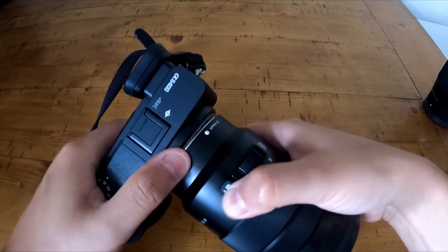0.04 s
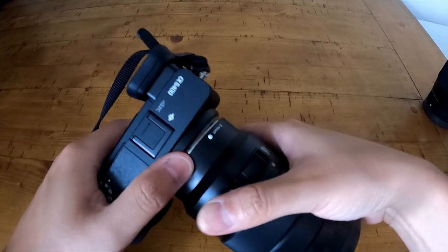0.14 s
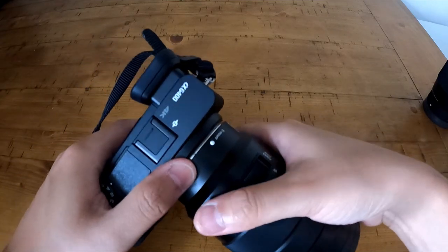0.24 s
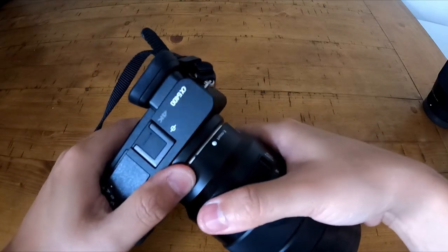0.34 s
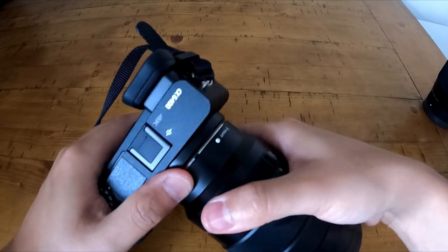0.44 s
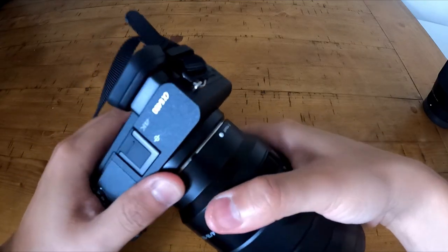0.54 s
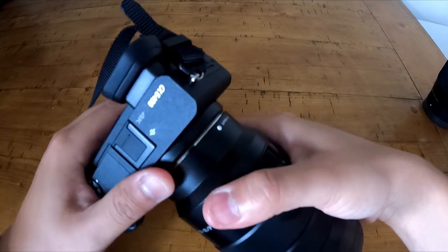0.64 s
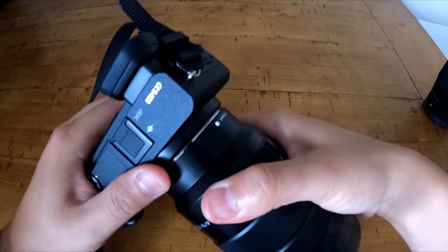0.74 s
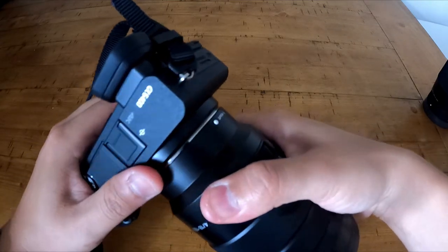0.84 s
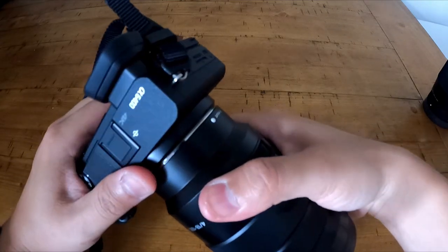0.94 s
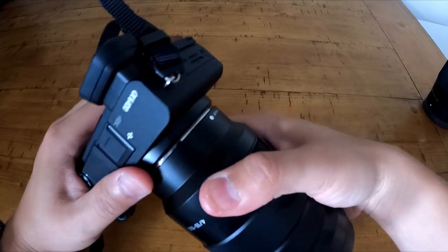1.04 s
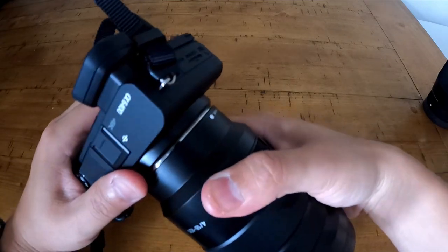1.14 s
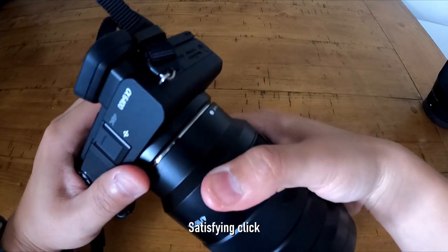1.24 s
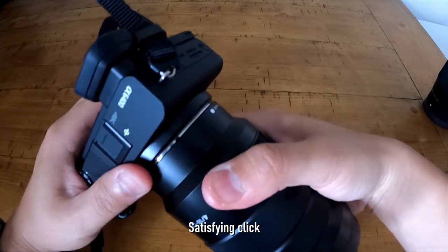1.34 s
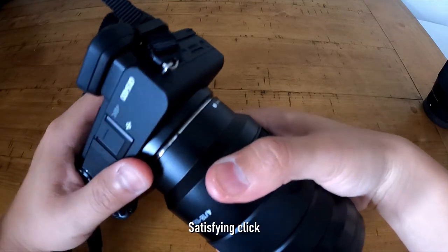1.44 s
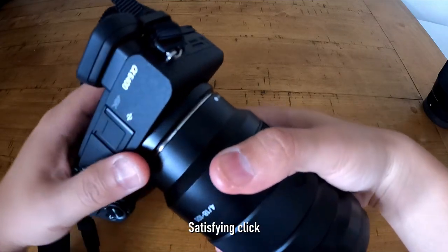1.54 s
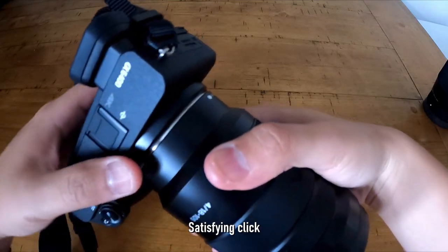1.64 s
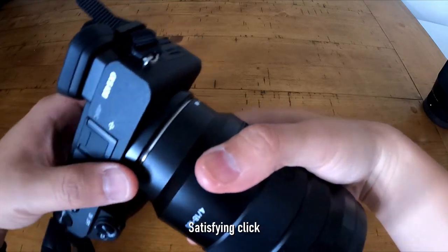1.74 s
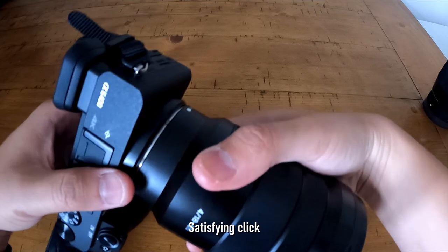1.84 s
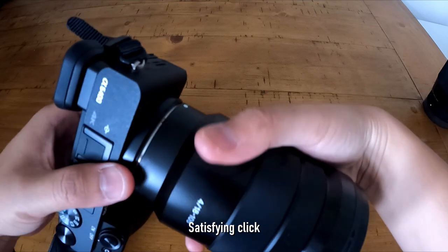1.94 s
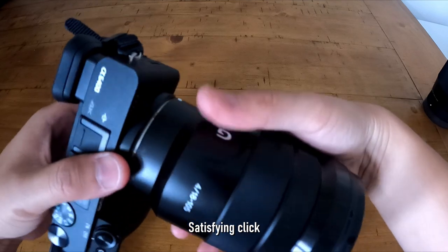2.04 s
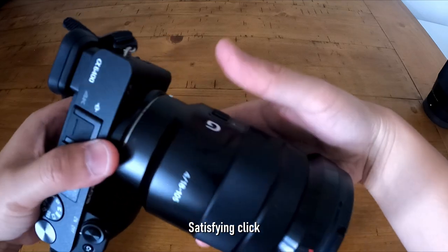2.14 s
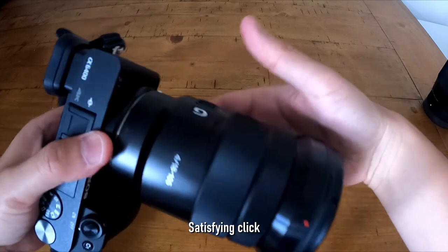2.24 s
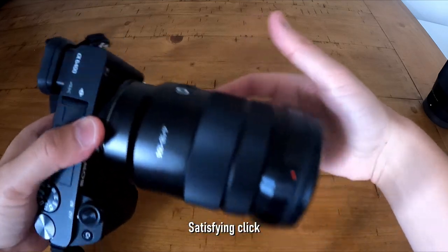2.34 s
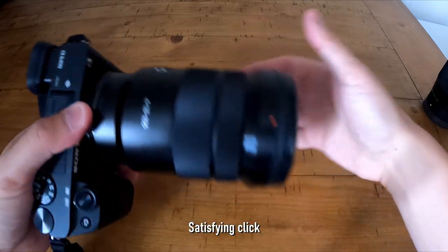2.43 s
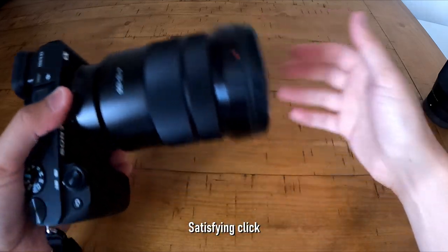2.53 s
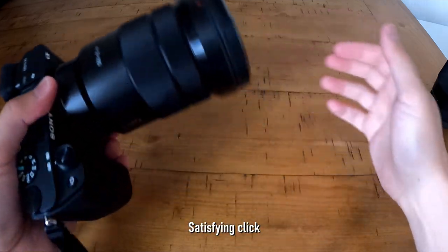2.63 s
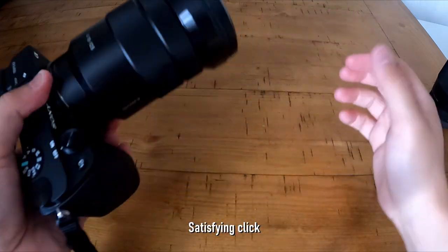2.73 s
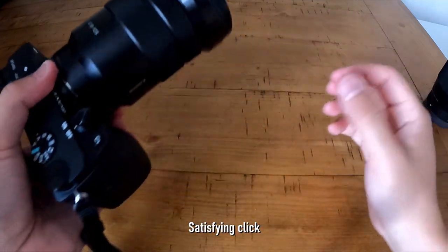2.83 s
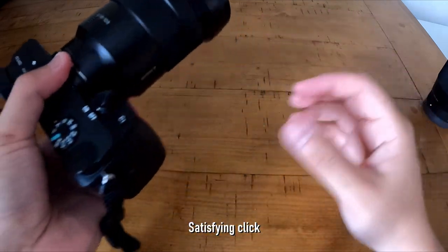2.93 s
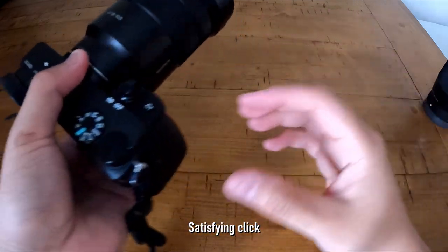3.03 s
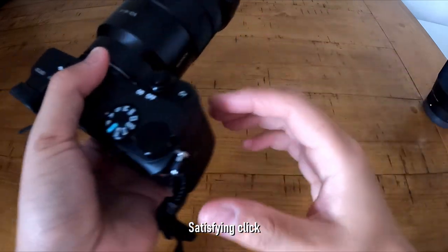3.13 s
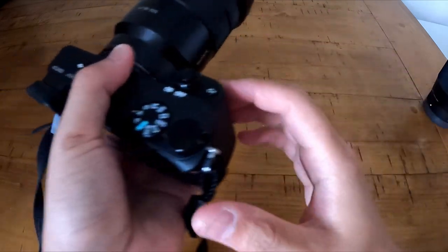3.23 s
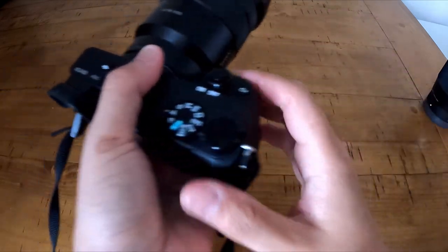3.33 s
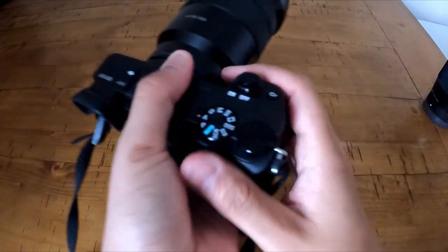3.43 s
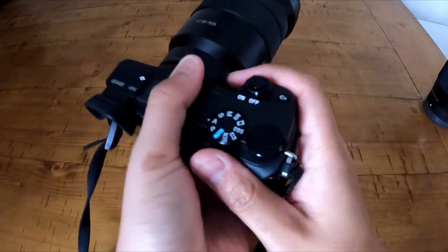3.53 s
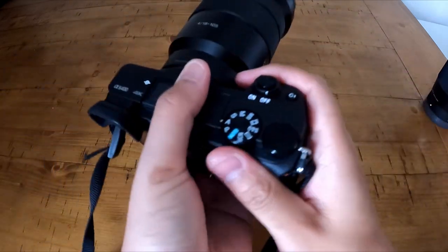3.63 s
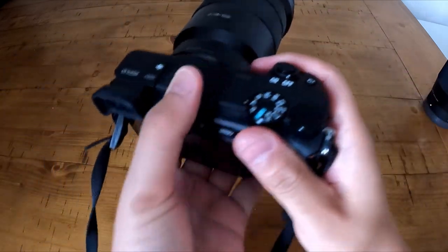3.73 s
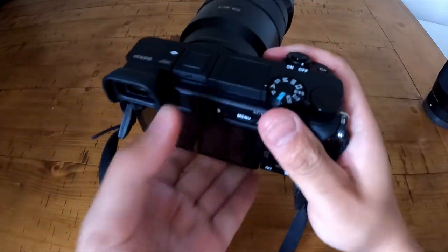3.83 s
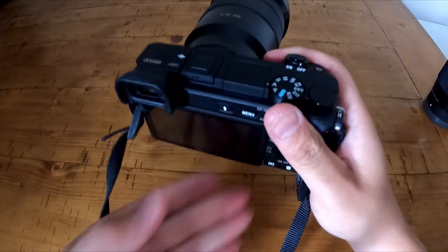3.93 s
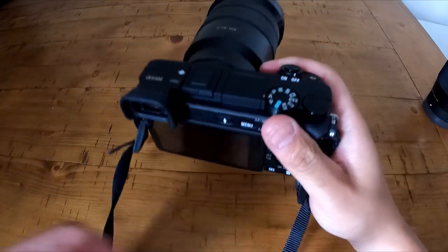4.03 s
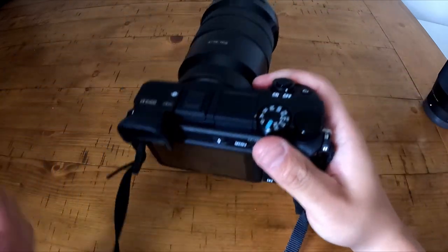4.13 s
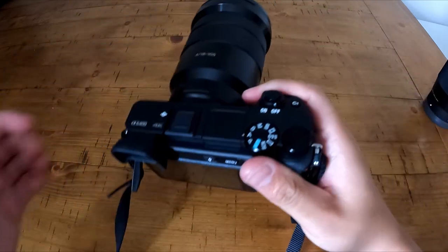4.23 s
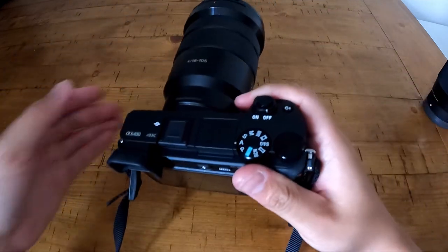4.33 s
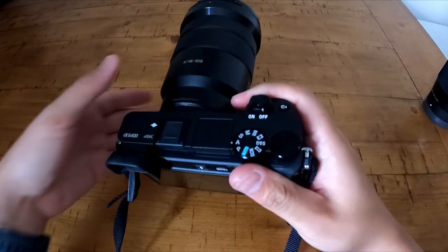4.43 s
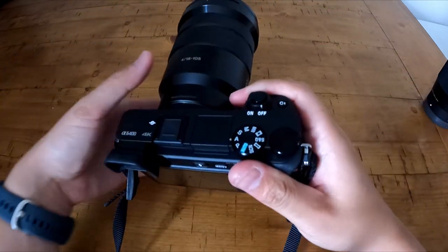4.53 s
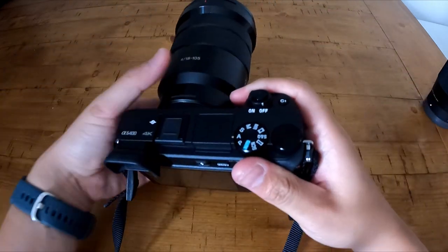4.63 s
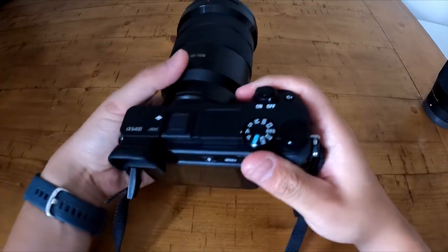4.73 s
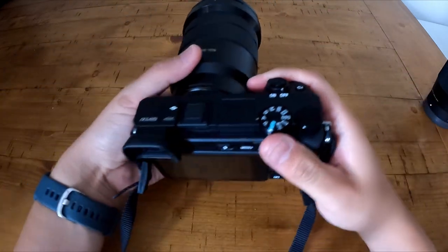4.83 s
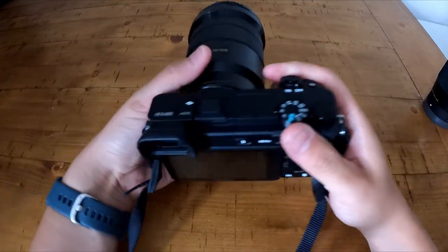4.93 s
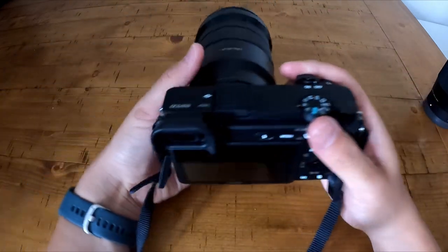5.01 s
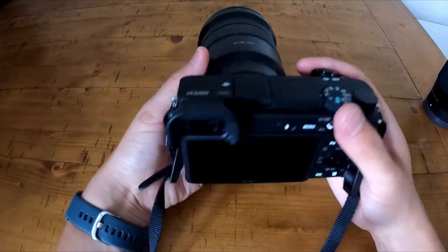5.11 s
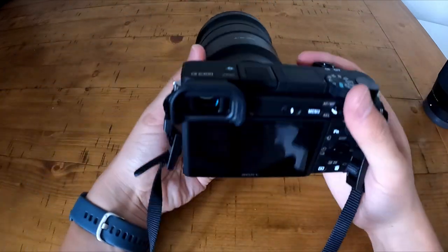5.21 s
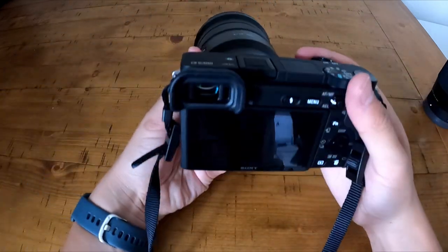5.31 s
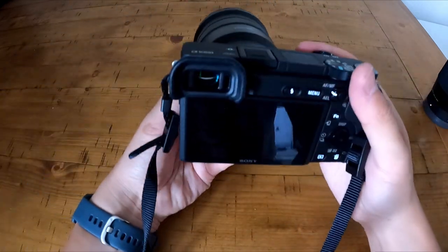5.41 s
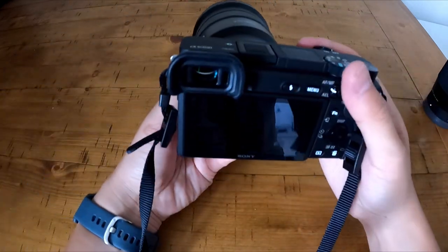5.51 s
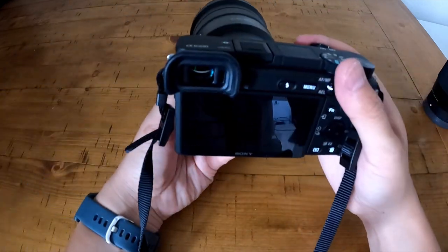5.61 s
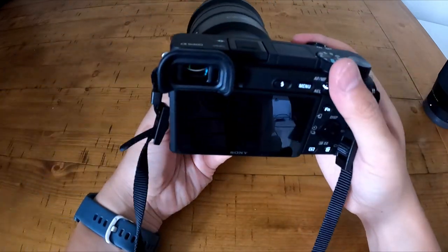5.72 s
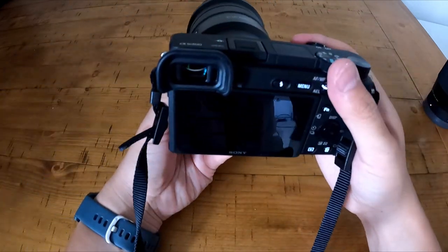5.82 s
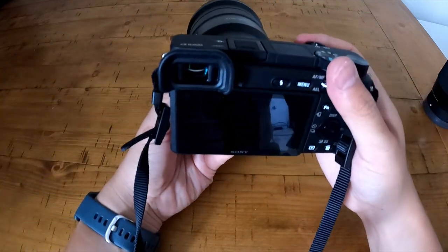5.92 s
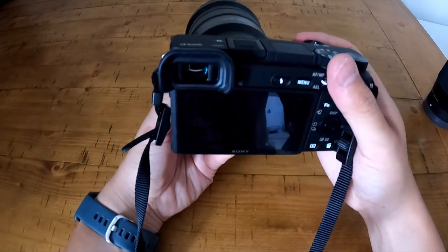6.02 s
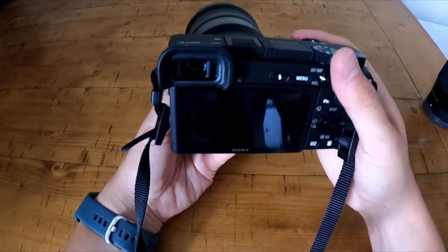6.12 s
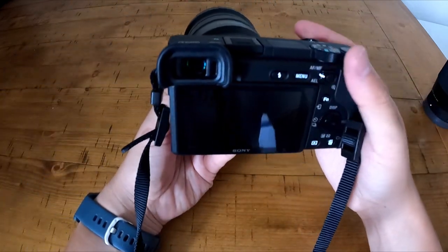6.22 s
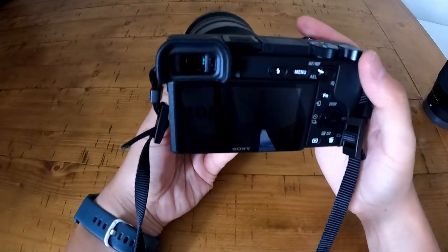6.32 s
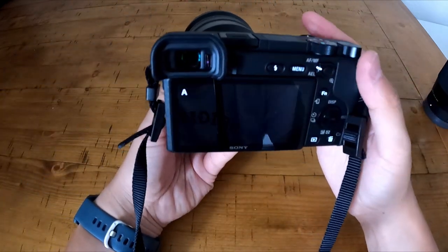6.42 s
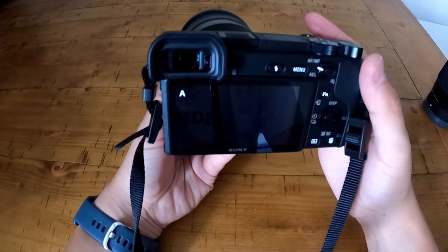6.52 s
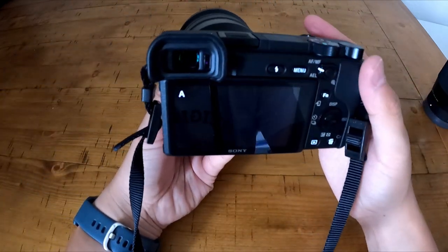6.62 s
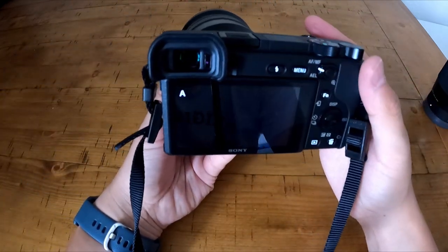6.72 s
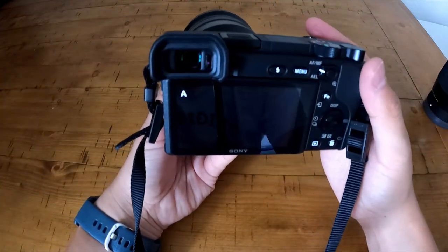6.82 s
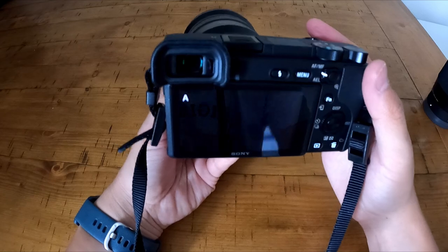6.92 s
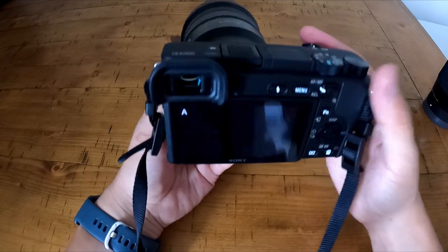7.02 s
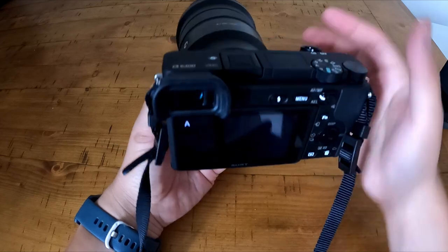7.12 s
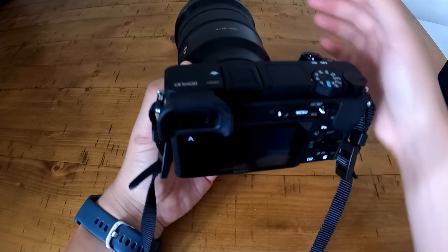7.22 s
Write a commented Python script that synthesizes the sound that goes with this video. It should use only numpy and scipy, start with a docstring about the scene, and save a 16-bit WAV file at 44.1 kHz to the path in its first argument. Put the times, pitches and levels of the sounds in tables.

```python
"""A small quiet room, at a wooden table: a lens is twisted onto a camera. The bayonet grates as noise grains,
the flange slides as filtered noise, and the locking pin snaps home as impulses into resonances.
Fingers hiss and rasp over the finish by friction; the shell creaks and ticks, a loose part clatters,
the grip knocks, a button clicks and the power switch is flicked: brief forces ring resonant bodies.
Dull thumps ring the table's decaying modes over faint room hiss and a low steady drone of shaped noise."""
import sys
import numpy as np
from scipy import signal
from scipy.fft import rfft, irfft, next_fast_len
from scipy.io import wavfile
from scipy.ndimage import uniform_filter1d, map_coordinates

SR = 44100
rng = np.random.default_rng(int(sys.argv[2]) if len(sys.argv) > 2 else 0)


def unload_wav(signal):
    """Save mono or channel-first audio to the path in sys.argv[1] as 16-bit WAV at rate SR, clipped to [-1, 1]."""
    wavfile.write(
        sys.argv[1],
        SR,
        np.round(np.clip(np.atleast_2d(signal).T, -1, 1) * 32767).astype(np.int16),
    )


N = 320166

# blows of the locking pin, which skips twice, drops in and chatters: t/s, peak level/dB
PIN_BLOWS = [(1.2374, -20.5), (1.2396, -18.5), (1.2427, -8.5), (1.2441, -14.5), (1.2452, -24)]
# blows of the power switch riding over its detent: t/s, peak level/dB before panning
SWITCH_BLOWS = [(6.0357, -45), (6.0464, -36), (6.0499, -37.5), (6.0535, -29.5), (6.0556, -28.5),
                (6.0569, -9), (6.0575, -11), (6.0589, -15.5)]
# resonances of the camera shell: f/Hz, width/Hz, relative level/dB
SHELL_MODES = [(633, 84, 7), (1077, 63, 6.5), (1293, 170, 1), (1810, 170, 2.5), (2090, 84, 2),
               (2457, 230, -1.5), (2866, 240, -1.5), (3360, 540, -7), (4200, 140, -5), (4740, 220, -5),
               (5640, 880, -10), (7500, 1500, -9), (10920, 2600, -17.5)]


def amp(db):
    """Amplitude ratio of a level: 20 dB is a factor of ten."""
    return 10 ** (np.asarray(db) / 20)


def unit(x):
    """Normalisation by mean power: scale to rms 1."""
    return x / np.sqrt(np.mean(x ** 2) + 1e-20)


def peak(x):
    """Normalisation by the extreme value: scale to peak 1."""
    return x / (np.abs(x).max() + 1e-20)


def along(points, hz):
    """Interpolation of (f/Hz, value) points on a logarithmic frequency axis."""
    f, v = np.transpose(points)
    return np.interp(np.log(hz + 1), np.log(f + 1), v)


def clock(size):
    """Sampling instants in seconds."""
    return np.arange(size) / SR


def add(track, s, x):
    """Superposition: mix x into the track at s seconds."""
    part = track[..., max(0, round(s * SR)):][..., :x.shape[-1]]
    part += x[..., :part.shape[-1]]


def filtered(x, response):
    """Linear filtering: multiply the zero-padded spectrum by a frequency response."""
    n = x.shape[-1]
    m = next_fast_len(n + min(n, SR // 4))
    spectrum = rfft(x, m) * response(np.fft.rfftfreq(m, 1 / SR))
    return irfft(spectrum, m)[..., :n]


def band(f, hz, width):
    """Causal second-order resonance with unit gain at its centre."""
    return 1j * f * width / (hz * hz - f * f + 1j * f * width)


def body(modes, f):
    """Modal superposition: resonances summed with alternating sign."""
    return sum((-1) ** k * amp(db) * band(f, hz, width) for k, (hz, width, db) in enumerate(modes))


def pair(size, side_db):
    """Partial stereo coherence: white noise shared by both channels plus an opposed side part."""
    mid, side = rng.standard_normal((2, size))
    side = amp(side_db) * side
    return np.array([mid + side, mid - side])


def noise(spectrum, side_db):
    """Spectral shaping of white stereo noise, brought to rms 1."""
    return unit(filtered(pair(N, side_db), lambda f: amp(along(spectrum, f))))


def wobble(rate):
    """Band-limited random fluctuation: a smooth curve through rate random knots a second."""
    knots = rng.standard_normal(int(N * rate / SR) + 4)
    return map_coordinates(knots, [np.arange(N) * rate / SR])


def contact(grit_db, t60):
    """Contact force: a broadband impulse and the decaying crunch of the two surfaces."""
    t = clock(size=2048)
    blow = t == 0
    return blow + amp(grit_db - 60 * t / t60) * pair(len(t), side_db=-8.5)


def snap(contacts, modes, grit_db, t60, broaden=1):
    """Impulsive excitation: a sprung part strikes repeatedly and rings resonances of scaled width."""
    out = np.zeros((2, N))
    modes = [(hz, width * broaden, db) for hz, width, db in modes]
    for s, db in contacts:
        blow = filtered(contact(grit_db, t60), lambda f: body(modes, f))
        add(out, s, amp(db) * peak(blow))
    return out


def hardest(contacts):
    """Time in seconds of the blow with the highest level."""
    return max(contacts, key=lambda row: row[1])[0]


def latch(ring_db, crack_db=-16, crack_hz=2300, crack_width_hz=1400):
    """Free vibration after impact: the pin locks, its hardest blow cracks and the barrel rings."""
    # resonances of the lens mount: f/Hz, width/Hz, relative level/dB
    mount_modes = [(427, 160, -24), (700, 100, -14), (1190, 140, -11), (1700, 220, -8.5), (2300, 100, -1),
                   (2680, 70, 1), (3230, 130, -4.5), (4010, 120, -5.5), (5170, 500, -8), (6420, 530, -6.5),
                   (7260, 300, 1.5), (9600, 320, -13), (10470, 990, -16)]
    # after-ring of the lens barrel: f/Hz, relative level/dB, t60/s
    barrel_modes = [(986.3, -6, 0.23), (1880, -17.5, 0.3), (2464, -12, 0.27), (2715, -0.5, 0.14),
                    (3200, -14, 0.25), (5300, -19, 0.2), (6788, -15, 0.13), (7530, -14.5, 0.13)]
    out = snap(PIN_BLOWS, mount_modes, grit_db=-12.5, t60=0.011)
    t = clock(size=16384)
    ring = sum(amp(db - 60 * t / t60) * np.sin(2 * np.pi * hz * t) for hz, db, t60 in barrel_modes)
    impulse = 1.0 * (t == 0)
    crack = peak(filtered(impulse, lambda f: band(f, crack_hz, crack_width_hz) ** 2))
    add(out, hardest(PIN_BLOWS), amp(ring_db) * ring + amp(crack_db) * crack)
    return out


def bayonet(rough_db=3):
    """Granular friction: dense metal grains swell and stop as the lugs engage."""
    # grating of the lugs: middle t/s, half length/s, rms level/dB before the swell, tilt/dB per octave
    grates = [(0.482, 0.0055, -49.5, -2), (0.4983, 0.0039, -39, 2.5), (0.509, 0.0042, -39.5, 0),
              (0.682, 0.0051, -45, 1.5), (0.6839, 0.0016, -38.5, 19.5)]
    # spectrum of the lugs: f/Hz, relative level/dB
    lug_spectrum = [(88, -54), (150, -3), (674, -0.5), (850, -4.5), (1600, -6.5), (2000, -12),
                    (3200, -12.5), (4400, -6), (6000, -16), (7350, -21.5), (12600, -52), (15000, -59)]
    out, t = np.zeros((2, N)), clock(size=4096)
    middle = t.mean()
    for s, half, db, tilt in grates:
        roughness = rng.standard_normal(len(t) // 32).repeat(32)
        grains = pair(len(t), side_db=-11) * amp(rough_db * roughness)
        scrape = unit(filtered(grains, lambda f: amp(along(lug_spectrum, f) + tilt * np.log2(1 + f / 1000))))
        swell = 1 / np.cosh((t - middle) / half)
        add(out, s - middle, amp(db) * scrape * swell)
    return out


def stroke(t, length):
    """Envelope of sliding friction: attack, an arched hold strongest midway, exponential release."""
    attack_s, attack_share = 0.025, 0.098  # long strokes set in more slowly, by this share of their length
    release_s, arch_db = 0.026, 1
    arch = np.sin(np.pi * np.minimum(t / length, 1)) - .5
    rise = np.minimum(t / (attack_s + attack_share * length), 1)
    return rise * amp(arch_db * arch) * np.exp(-np.maximum(t - length, 0) / release_s)


def reach(s, length):
    """Time support: the samples of a stroke and its release, and their times since its start."""
    part = slice(max(0, round(s * SR)), round((s + length) * SR) + SR // 6)
    return part, clock(N)[part] - s


def flange(grain_db=3.0):
    """Sliding friction: amplitude-modulated noise as metal turns smoothly on metal."""
    # turns of the lens: start t/s, length/s, rms level/dB of the slide before its envelope
    turns = [(0.572, 0.084, -60.5), (0.892, 0.16, -67), (1.138, 0.12, -59)]
    # spectrum of the metal flange: f/Hz, relative level/dB
    flange_spectrum = [(500, -23), (1100, -2), (2200, 0.5), (3600, -5.5), (4800, -1.5), (6000, -6),
                       (7400, 2.5), (8700, -13.5), (12000, -19), (15500, -29.5)]
    out = np.zeros((2, N))
    slide = unit(noise(flange_spectrum, side_db=-8.5) * amp(grain_db * wobble(1500)))
    for s, length, db in turns:
        part, t = reach(s, length)
        add(out, s, amp(db) * stroke(t, length) * slide[:, part])
    return out


def power_switch():
    """Detent impacts: the switch rings the top plate, slightly stronger on the right."""
    # top plate: f/Hz, width/Hz before broaden, relative level/dB
    plate_modes = [(958, 63, -4), (1330, 240, -15.5), (2040, 340, -2), (2950, 730, -4.5), (3674, 470, -4),
                   (4500, 450, 3.5), (5510, 690, -0.5), (6170, 290, 3), (6950, 432, -2),
                   (10500, 1700, -19.5)]
    blows = snap(SWITCH_BLOWS, plate_modes, grit_db=-13.0, t60=0.0037, broaden=0.88)
    return blows * amp([[-1.2], [1.2]])


def button_click():
    """Impulsive excitation: a button dips and clicks, ringing its cap."""
    # blows of the button: t/s, peak level/dB
    presses = [(6.263, -47.5), (6.2925, -47), (6.2937, -34)]
    # button cap: f/Hz, width/Hz, relative level/dB
    cap_modes = [(1990, 280, 2.5), (2600, 580, -2.5), (4400, 560, -6), (5900, 840, -9.5), (8950, 2000, -37)]
    return snap(presses, cap_modes, grit_db=-13.5, t60=0.0038)


def patchy(x, depth_db):
    """Random spectral modulation: a rub's colour shifts as new surface spots come into contact."""
    z = signal.stft(x, nperseg=512)[2]
    field = rng.standard_normal(z.shape[1:])
    field = uniform_filter1d(field, size=14, axis=0)
    field = uniform_filter1d(field, size=9, axis=1)
    return signal.istft(z * amp(depth_db * unit(field)), nperseg=512)[1][:, :N]


def fingers(skin_db, grip_db, grain_db, catch_db, rasp_grain_db=2.0, breadth=0.79, hiss_breadth=1.2, dull_db=-11):
    """Friction noise: skin hisses, brighter at speed, and rasps on the shell's resonances."""
    # finger strokes: start t/s, length/s, hiss level/dB before skin_db, hiss centre f/Hz at full speed,
    # rasp level/dB before grip_db, rasp centre f/Hz; both levels are rms before the envelope
    strokes = [(-0.03, 0.097, -59.5, 4800, -64, 1600), (0.157, 0.072, -58.5, 4200, -64, 2220),
               (0.226, 0.046, -60.5, 7000, -69, 1800), (0.282, 0.047, -65.5, 7500, -66, 1780),
               (0.415, 0.055, -73, 4500, -64.5, 1370), (0.5, 0.2, -68.5, 4000, -71, 920),
               (1.746, 0.072, -71, 3970, -66.5, 1790), (1.826, .15, -73.5, 6400, -71.5, 1330),
               (2.026, 0.064, -61.5, 5730, -70, 1800), (2.122, 0.12, -59, 4000, -64, 2000),
               (2.175, 0.082, -61.5, 7500, -70.5, 2530), (2.26, 0.061, -65, 7200, -72, 1870),
               (2.315, 0.12, -73.5, 5780, -73.5, 1580), (2.547, 0.079, -67, 5870, -71.5, 1620),
               (2.661, 0.071, -70.5, 6470, -72, 1530), (2.755, 0.082, -76, 4960, -74, 1510),
               (2.889, 0.065, -66, 4970, -63.5, 2180), (2.957, 0.073, -77, 4480, -61, 2170),
               (3.096, 0.054, -86, 4470, -63, 1880), (3.165, 0.064, -67.5, 5900, -55.5, 2180),
               (3.285, 0.14, -75.5, 5500, -70.5, 1390), (3.394, 0.22, -64, 6400, -68.5, 1380),
               (3.486, 0.091, -66, 4400, -66, 1700), (3.595, 0.09, -76, 5500, -60.5, 1570),
               (3.7, 0.046, -75, 5000, -66.5, 1700), (3.742, 0.072, -53, 5900, -61, 1760),
               (3.806, 0.14, -68.5, 6540, -59, 1630), (4.094, 0.11, -74.5, 5030, -67, 1770),
               (4.204, 0.078, -83, 4500, -63.5, 2120), (4.315, 0.14, -87.5, 5000, -74, 1700),
               (4.764, 0.076, -61.5, 6500, -73.5, 1900), (4.975, 0.12, -66.5, 6040, -63.5, 2280),
               (5.171, 0.052, -66, 5500, -61, 2400), (5.264, 0.085, -67, 4800, -60, 1990),
               (6.235, 0.19, -73, 4970, -75, 2020), (7.093, 0.12, -77, 5000, -62, 1950)]
    # spectrum of the skin: f/Hz, relative level/dB
    skin_spectrum = [(1180, -30.5), (2000, -5.5), (2540, -4), (4000, -2.5), (4790, -0.5), (5740, -1),
                     (7050, -1.5), (8360, -8), (12100, -11), (14000, -24), (15500, -40)]
    hold_db, hold_until_s = -83.5, 5.45  # faint hiss while the hands keep turning the camera
    brighten = 1.56  # rise of the hiss centre from rest to full speed
    catch, grain = catch_db * wobble(45), wobble(1500)
    skin = unit(patchy(noise(skin_spectrum, side_db=-9.5), depth_db=4.0) * amp(catch + grain_db * grain))
    friction = patchy(pair(N, side_db=-7), depth_db=2.5) * amp(catch + rasp_grain_db * grain)
    grip = filtered(friction, lambda f: np.hypot(abs(body(SHELL_MODES, f)), amp(dull_db) * abs(band(f, 830, 3800))))

    def hiss(part, hz):
        """Band-pass filtering of the skin noise, at rms 1."""
        return unit(filtered(skin[:, part], lambda f: abs(band(f, hz, hiss_breadth * hz))))

    out = amp(hold_db) * skin / (1 + np.exp(10 * (clock(N) - hold_until_s)))
    for s, length, hiss_db, hiss_hz, rasp_db, rasp_hz in strokes:
        part, t = reach(s, length)
        speed = np.sin(np.pi * np.minimum(t / length, 1))
        slow, fast = hiss(part, hiss_hz / brighten), hiss(part, hiss_hz)
        rasp = unit(filtered(grip[:, part], lambda f: band(f, rasp_hz, breadth * rasp_hz)))
        slide = amp(hiss_db + skin_db) * (slow + speed * (fast - slow))
        slide = slide + amp(rasp_db + grip_db) * rasp
        add(out, s, stroke(t, length) * slide)
    return out


def squeak(waver=0.0051):
    """Stick-slip tone: fingertips squeak softly as a sine of unsteady frequency."""
    # squeaks: start t/s, length/s, rms level/dB before the envelope, mean f/Hz
    squeaks = [(3.612, .08, -61, 1070), (6.97, .11, -69, 620)]
    out, t = np.zeros((2, N)), clock(size=16384)
    for s, length, db, hz in squeaks:
        drift = rng.standard_normal(64).repeat(256)
        phase = 2 * np.pi * np.cumsum(hz * (1 + waver * drift)) / SR
        add(out, s, amp(db) * stroke(t, length) * unit(np.sin(phase)))
    return out


def shell(force, hz, breadth=1.0):
    """Forced modal response: harder contacts favour the shell's higher resonances."""
    softness = 3.3  # a contact holds little above this multiple of its centre frequency

    def response(f):
        """Shell modes weighted by the contact's band and its high-frequency roll-off."""
        rolloff = np.sqrt(1 + (f / (softness * hz)) ** 6)
        return body(SHELL_MODES, f) * band(f, hz, breadth * hz) ** 2 / rolloff

    return peak(filtered(force, response))


def creaks(uneven=0.265):
    """Stick-slip: the gripped shell slips at an uneven rate and sets the hollow grip ringing."""
    # runs of slips: start t/s, length/s, peak level/dB, centre f/Hz
    slip_runs = [(5.073, 0.012, -46, 2000), (5.0895, 0.011, -35, 3200), (5.103, 0.007, -32, 2500),
                 (5.194, .004, -46, 3300), (5.203, .011, -40, 3000)]
    # the hollow grip: f/Hz, width/Hz, level/dB relative to the direct force
    hollow_modes = [(1050, 45, 3), (2060, 70, 5)]
    slips_per_s = 380
    out = np.zeros((2, N))
    for s, length, db, hz in slip_runs:
        force = np.zeros((2, SR // 8))
        slips = rng.standard_normal((16, 2))[:int(length * slips_per_s) + 1]
        for k, (late, size) in enumerate(slips):
            slip = amp(1.5 * size) * contact(grit_db=-16, t60=0.012)
            add(force, (k + uneven * late) / slips_per_s, slip)
        force = filtered(force, lambda f: 1 + sum(amp(level) * band(f, centre, width)
                                                  for centre, width, level in hollow_modes))
        add(out, s, amp(db) * shell(force, hz))
    return out


def ticks():
    """Impulse response: light taps of nails, buttons and strap rings on the shell."""
    # taps: t/s, peak level/dB, centre f/Hz
    taps = [(0.376, -51, 4500), (0.397, -45, 950), (0.425, -49, 4600), (0.442, -43.5, 4840),
            (0.481, -50, 1500), (0.4937, -44, 1430), (0.89, -57, 5970), (0.905, -53, 8000),
            (1.077, -44, 7100), (1.451, -51.5, 2000), (1.751, -59, 2480), (1.979, -59.5, 5960),
            (2.053, -63, 7000), (2.134, -46.5, 1880), (2.677, -59, 7000), (3.637, -45.5, 4000),
            (3.643, -43.5, 4500), (3.75, -38.5, 4200), (3.951, -37.5, 5250), (3.983, -51, 5540),
            (4.1, -48.5, 2810), (4.264, -47.5, 2600), (5.0048, -37.5, 3700), (5.039, -47, 3200),
            (5.184, -38.5, 2800), (5.431, -53, 1000), (5.51, -53, 2580), (6.326, -45, 6170),
            (6.376, -54.5, 4200)]
    out = np.zeros((2, N))
    for s, db, hz in taps:
        add(out, s, amp(db) * shell(contact(grit_db=-9.5, t60=0.01), hz))
    return out


def rattle(blows, modes, grit_db, t60, vary_db, soft_hz=7500):
    """Position-dependent modal excitation: each blow lands on a new spot and reweights the modes."""
    out = np.zeros((2, N))
    for s, db in blows:
        spot = [(hz, width, level + vary_db * rng.standard_normal()) for hz, width, level in modes]
        blow = filtered(contact(grit_db, t60), lambda f: body(spot, f) / (1 + (f / soft_hz) ** 4))
        add(out, s, amp(db) * peak(blow))
    return out


def loose_part():
    """Repeated impact: a loose part clatters as the camera changes hands."""
    # blows of the loose part: t/s, peak level/dB
    clatter_blows = [(3.8335, -36), (3.838, -38), (3.8495, -37), (3.855, -38), (3.8732, -40.5),
                     (3.8785, -34), (3.8875, -41), (3.909, -46), (3.9345, -47.5), (3.94, -41),
                     (4.145, -55.5), (4.157, -59), (4.243, -49)]
    # the loose part: f/Hz, width/Hz, mean relative level/dB
    loose_modes = [(1060, 45, -9), (1690, 60, 3), (2030, 100, -2), (2450, 300, -10), (2960, 120, -8),
                   (4170, 200, -14), (4750, 300, -15), (7000, 1500, -33)]
    return rattle(clatter_blows, loose_modes, grit_db=-17.5, t60=0.0032, vary_db=3.0)


def grip_knocks():
    """Repeated impact: the camera knocks in the hand as the grip loosens."""
    # knocks: t/s, peak level/dB
    knock_blows = [(6.66, -44), (6.6825, -46), (6.6862, -30.5), (6.6885, -31), (6.6944, -35.5),
                   (6.738, -48), (6.918, -51.5), (7.18, -40), (7.187, -50), (7.2205, -41.5)]
    # body around the grip: f/Hz, width/Hz, mean relative level/dB
    grip_modes = [(560, 140, -14.5), (783, 23, -3.5), (1320, 117, 0.5), (1690, 220, -5.5), (1980, 135, 0),
                  (2580, 160, -8.5), (2900, 140, -10.5), (4200, 380, -14.5), (4800, 160, -14.5),
                  (7000, 2000, -30)]
    return rattle(knock_blows, grip_modes, grit_db=-15.5, t60=0.018, vary_db=1.5)


def thumps(attack=0.0029, breadth=0.14):
    """Modal decay: soft bumps ring the table's modes, most of all those near their own centre."""
    # dull bumps on the table: t/s, peak level/dB, centre f/Hz
    bumps = [(3.634, -49, 90), (5.32, -33, 150), (5.434, -42, 405), (5.721, -56, 100), (6.965, -49, 100)]
    # low modes of the table: f/Hz, relative level/dB, t60/s, right channel gain against left
    table_modes = [(69.6, -1.5, 0.34, 2.6), (151.7, 3.5, 0.27, 0), (167.3, -12.5, 0.24, 3.5),
                   (289, -1, 0.11, 8), (331, -8.5, 0.42, 6), (402, 3.5, 0.2, 1.06), (681, -14, 0.22, 6.5)]
    out, t = np.zeros((2, N)), clock(size=16384)
    for s, db, centre in bumps:
        ring = np.zeros((2, len(t)))
        for hz, level, t60, right in table_modes:
            weight = abs(band(hz, centre, breadth * centre))
            mode = weight * amp(level - 60 * t / t60) * np.sin(2 * np.pi * hz * t)
            ring += np.outer([1, right], mode)
        add(out, s, amp(db) * peak(ring * (1 - np.exp(-t / attack))))
    return out


def decaying_noise(levels, t60, side_db):
    """Diffuse decay: half a second of noise with a level and decay time for each frequency."""
    hz, t, z = signal.stft(pair(SR // 2, side_db), SR, nperseg=256)
    fade = amp(along(levels, hz)[:, None] - 60 * t / t60(hz)[:, None])
    return signal.istft(z * fade, SR, nperseg=256)[1]


def wash(contacts, spectrum, db, t60, delay=0.0037):
    """Diffuse reverberation: a snap's hardest blow returns from all walls as an even decay."""
    tail = unit(decaying_noise(spectrum, lambda hz: np.full(len(hz), t60), side_db=-6.0))
    out = np.zeros((2, N))
    build_up = 1 - np.exp(-clock(tail.shape[1]) / delay)
    add(out, hardest(contacts), amp(db) * tail * build_up)
    return out


def snap_washes():
    """Reverberant field of the two snaps, each with its own spectrum."""
    # what the pin sends into the room: f/Hz, relative level/dB
    pin_spectrum = [(150, -27.5), (400, -16), (750, -13.5), (1030, -4), (1450, -14.5), (2000, -7.5),
                    (2700, -2.5), (3700, -14), (5000, -12), (7200, -7.5), (8500, -15.5), (12000, -22),
                    (15000, -32.5)]
    # what the switch sends into the room: f/Hz, relative level/dB
    switch_spectrum = [(300, -34.5), (750, -23.5), (980, -6.5), (1300, -11.5), (1900, -8), (3100, -0.5),
                       (4200, -0.5), (5200, 0), (7000, -7.5), (8500, -16.5), (12000, -23.5), (15000, -30)]
    pin = wash(PIN_BLOWS, pin_spectrum, db=-49.0, t60=0.25)
    return pin + wash(SWITCH_BLOWS, switch_spectrum, db=-50.5, t60=0.3)


def room(x, wet_db, delay=0.0025):
    """Reverberation by convolution: each half second of handling gets a freshly drawn noise tail."""
    # decay of the room: f/Hz, t60/s
    room_decay = [(150, 0.5), (400, 0.28), (1000, 0.2), (3000, 0.25), (7000, 0.18), (14000, 0.096)]
    # reflection from the walls: f/Hz, relative level/dB
    wall_levels = [(150, 2), (450, 1.5), (750, -1.5), (1100, 4), (1800, -2), (3200, -1), (5000, -4),
                   (7200, -6.5), (12000, -4)]
    out = np.zeros((2, N))
    for start in range(0, N, SR // 2):
        tail = decaying_noise(wall_levels, lambda hz: along(room_decay, hz), side_db=-5.5)
        tail = tail * (1 - np.exp(-(clock(tail.shape[1]) / delay) ** 2))
        source = x.mean(0)[None, start:start + SR // 2]
        add(out, start / SR, signal.fftconvolve(source, tail / np.linalg.norm(tail[0]), axes=1))
    return amp(wet_db) * out


def room_tone(air_db, drone_db):
    """Stationary shaped noise: faint hiss and a narrow low drone, stronger on the right."""
    # hiss of the room: f/Hz, relative level/dB
    air_spectrum = [(240, -27.5), (400, 2.5), (438, -7), (503, -3), (796, -12), (834, -6.5), (2400, -17),
                    (5390, -24.5), (6580, -21), (7320, -26.5), (15500, -42.5)]
    # low steady drone: f/Hz, relative level/dB
    drone_spectrum = [(25, -17), (45, -15.5), (70, -19), (105, -25), (128, -12), (148, 1), (175, -1),
                      (215, -5.5), (265, -17), (330, -22), (420, -28), (600, -45), (1200, -120)]
    drone = amp(drone_db) * noise(drone_spectrum, side_db=-12.0) * amp([[-3.5], [2]])
    return amp(air_db) * noise(air_spectrum, side_db=-2.0) + drone


def scene():
    """Direct and reverberant fields: handling close to the microphone, the small room around it."""
    handling = ticks() + creaks() + bayonet() + button_click() + loose_part() + grip_knocks()
    rubs = squeak() + flange() + fingers(skin_db=-2.0, grip_db=0.5, grain_db=1.0, catch_db=1.17)
    close = latch(ring_db=-39.5) + power_switch() + handling + thumps() + rubs
    reverberant = snap_washes() + room(handling, wet_db=-10.5)
    return close + reverberant + room_tone(air_db=-71.5, drone_db=-63)


def record(dry):
    """Low-pass filtering: the microphone's top end fades, then a steep band limit cuts off."""
    treble_hz, top_hz = 13800, 15800  # half-power frequencies
    soft = filtered(dry, lambda f: 1 / np.sqrt(1 + (f / treble_hz) ** 20))
    return filtered(soft, lambda f: 1 / np.sqrt(1 + (f / top_hz) ** 120))


dry = scene()
out = record(dry)
unload_wav(out)
```